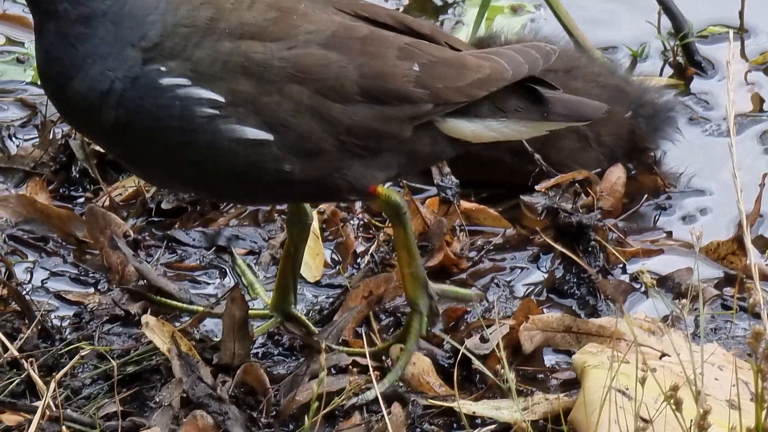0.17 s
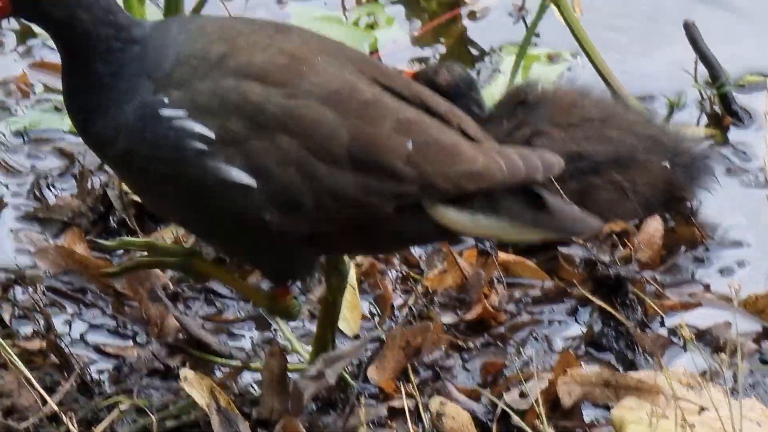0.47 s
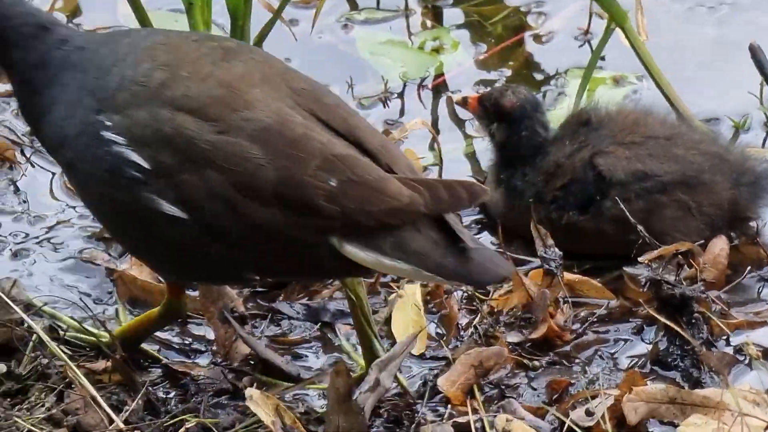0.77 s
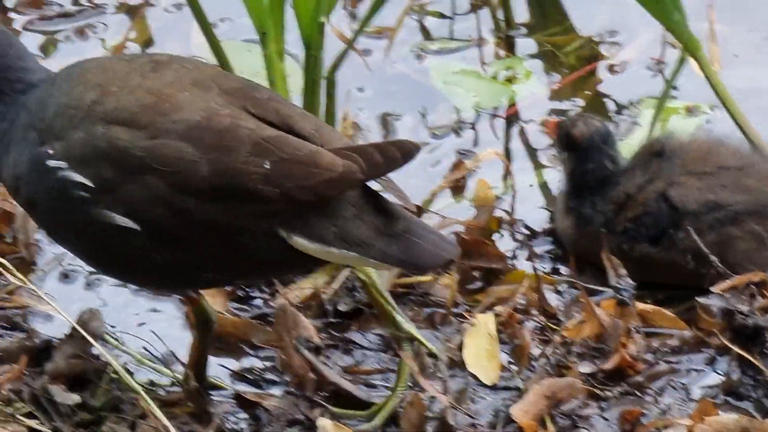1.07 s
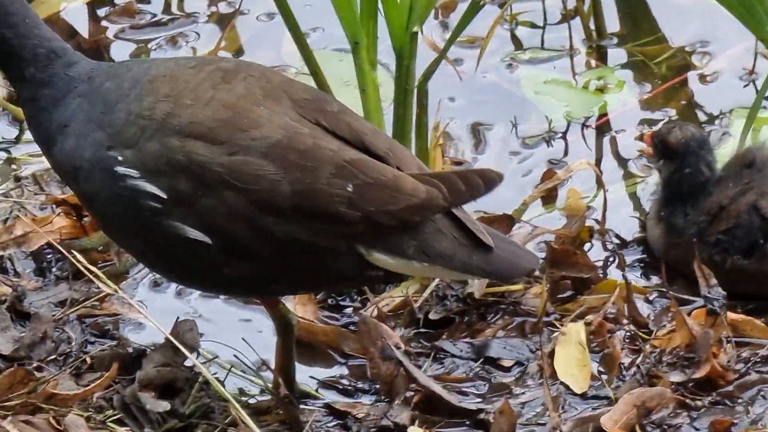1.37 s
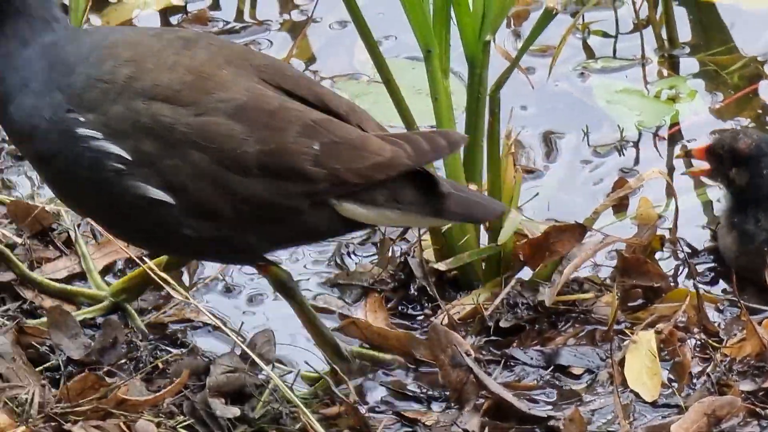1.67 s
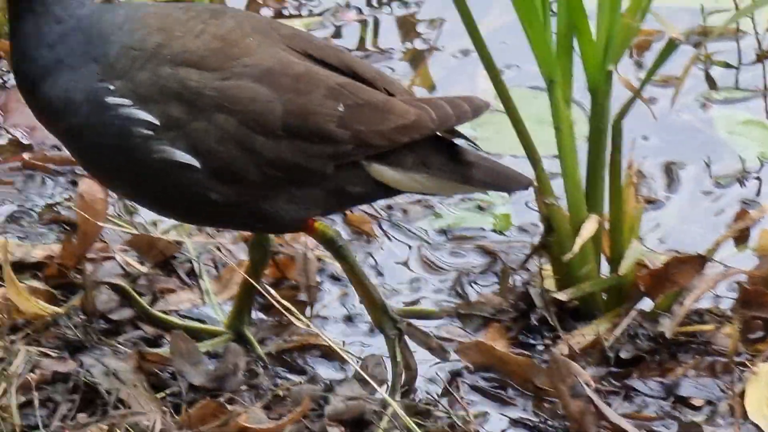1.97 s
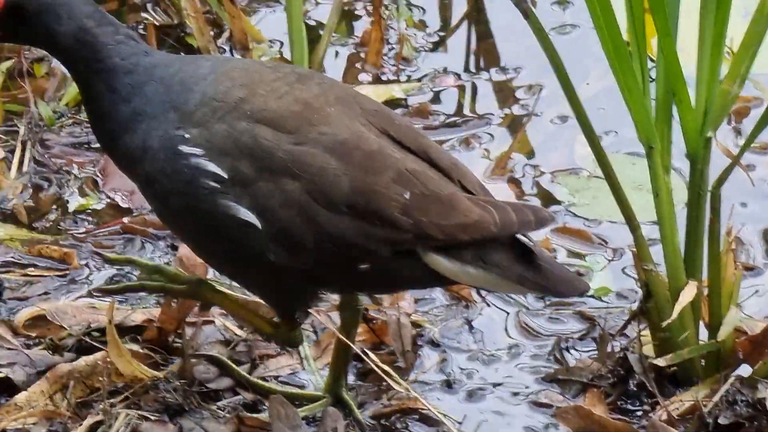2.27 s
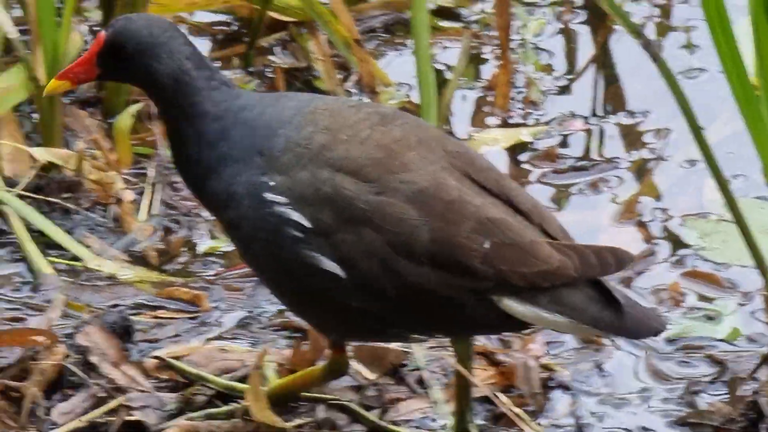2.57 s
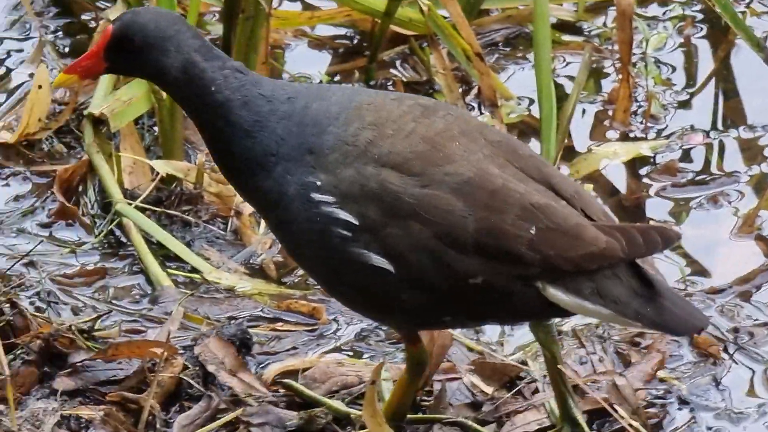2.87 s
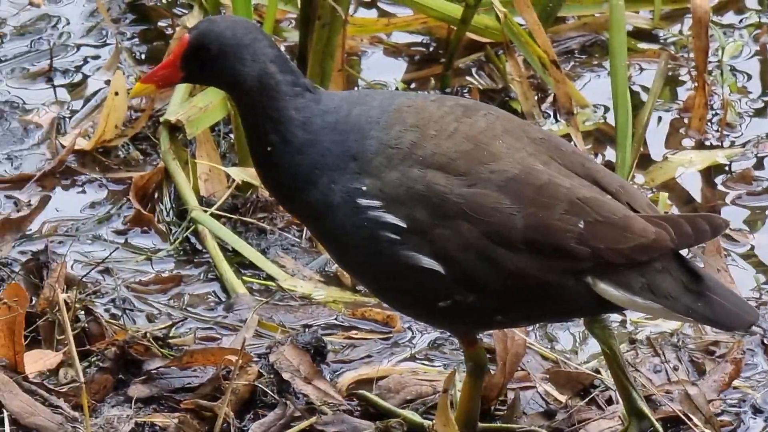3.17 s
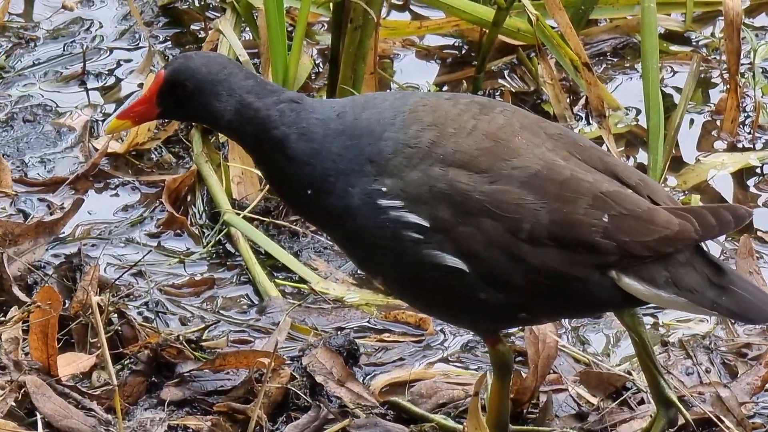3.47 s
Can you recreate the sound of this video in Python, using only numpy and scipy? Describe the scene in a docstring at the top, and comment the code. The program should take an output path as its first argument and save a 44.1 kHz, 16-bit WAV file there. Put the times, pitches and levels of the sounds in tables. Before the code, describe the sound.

Three raspy moorhen squeals sound on a pond bank, two early and one at the end. Between them come a chick's quick yelps, peeps, chirps and one falling whistle, with faint wet leaf ticks and a low rumble, in stereo.

```python
"""A harsh moorhen squeal at a pond edge, over a low, distant rumble. A second squeal follows, then the
chick's hoarse peeps and falling yelps, thin chirps, one clean whistle and a last squeal. Each voice is a
vibrating membrane in the syrinx, rasping when it turns chaotic. Wet leaves tick underfoot; ground and
bank scatter the calls on their way to a stereo microphone."""
import sys
import numpy as np
from scipy import signal
from scipy.fft import rfft, irfft
from scipy.io import wavfile
from scipy.ndimage import uniform_filter1d, map_coordinates

SR = 44100
rng = np.random.default_rng(int(sys.argv[2]) if len(sys.argv) > 2 else 0)


def int16_out(signal):
    """Quantize to a 16-bit WAV file."""
    q = np.round(np.clip(np.atleast_2d(signal).T, -1, 1) * 32767)
    wavfile.write(sys.argv[1], SR, q.astype(np.int16))


N = 159201

# harmonics 1 and 2 of a thin, nearly pure voice (relative level [dB])
THIN_VOICE_DB = [0, -32]
# spectrum of a wet leaf's tick (frequency [Hz], relative level [dB])
LEAF_SPECTRUM = [(800, -27), (3000, 16.5), (7000, 1), (15000, 7)]


def undb(db):
    """Decibels to gain."""
    return 10 ** (np.asarray(db) / 20)


def clock():
    """Time of each sample in seconds."""
    return np.arange(N) / SR


def over_hz(points):
    """Join (frequency [Hz], value) points on a log axis, for every spectral bin."""
    hz, value = np.array(points, float).T
    return np.interp(np.log(np.arange(N // 2 + 1) * SR / N + 1), np.log(hz), value)


def noise(spectrum):
    """Coloured noise of rms 1."""
    x = irfft(rfft(rng.standard_normal(N)) * undb(over_hz(spectrum)), N)
    return x / x.std()


def wander(rate):
    """A smooth random curve of spread 1, with about `rate` new values a second."""
    size = max(2, int(SR / rate))
    x = uniform_filter1d(uniform_filter1d(rng.standard_normal(N), size), size)
    return x / x.std()


def gate(start, end, edge_s=0.00081):
    """Open between two times, with soft edges."""
    t = clock()
    return np.sin(np.pi / 2 * np.clip(np.minimum(t - start, end - t) / edge_s + .5, 0, 1)) ** 2


def curves(rows):
    """The gate of a call, then its columns as curves in time."""
    times, *columns = np.array(rows, float).T
    return [gate(times[0], times[-1])] + [np.interp(clock(), times, c) for c in columns]


def distant_rumble(level_db=-48, swell_db=1.55, hum_waver_db=3):
    """Far-off rumble with a wavering hum; the bass is alike on both sides of the microphone."""
    # rumble spectrum (frequency [Hz], relative level [dB])
    spectrum = [(20, -21), (38, -12), (56, 0), (70, -6), (100, -10), (160, -19), (320, -22), (550, -30),
                (950, -33), (1500, -39), (6500, -44), (8200, -56), (11000, -55), (12500, -49)]
    # likeness of left and right (frequency [Hz], correlation [0-1])
    likeness = [(60, 0.93), (250, 0.92), (500, 0.5), (1000, 0.13)]
    # hum tones (frequency [Hz], level [dB])
    hum_tones = [(57, -52.5), (300, -68)]
    alike = over_hz(likeness)
    mid = irfft(rfft(noise(spectrum)) * np.sqrt((1 + alike) / 2), N)
    side = irfft(rfft(noise(spectrum)) * np.sqrt((1 - alike) / 2), N)
    hum = 0
    for hz, db in hum_tones:
        level = undb(db + hum_waver_db * wander(8.5))
        hum += level * np.sin(2 * np.pi * np.cumsum(hz + 3 * wander(10.26)) / SR)
    return undb(level_db + swell_db * wander(2.1)) * np.array([mid + side, mid - side]) + hum


def leaf_rustle(ticks_per_s=19, softest_db=-64, decay_s=0.00046):
    """Faint random ticks of wet leaves settling."""
    envelope, tick = 0, noise(LEAF_SPECTRUM)
    for when, size in rng.random((int(ticks_per_s * N / SR), 2)):
        age = np.maximum(clock() - when * N / SR, 0)
        envelope += (age > 0) * undb(softest_db + 10 * size) * np.exp(-age / decay_s)
    return envelope * tick


def footsteps(thud_s=0.0033, tick_s=0.0018):
    """Wet leaves underfoot: each step is a small thud and a tick, both dying quickly."""
    # steps (time [s], thud level [dB], tick level [dB])
    steps = [(0.819, -74, -55.5), (1.972, -44.5, -68), (2.274, -71, -56), (2.43, -77, -54)]
    # spectrum of the thud (frequency [Hz], relative level [dB])
    thud_spectrum = [(150, 4), (500, 7), (1000, -9), (3000, -42)]
    out, thud_noise, tick_noise = 0, noise(thud_spectrum), noise(LEAF_SPECTRUM)
    for start, thud_db, tick_db in steps:
        age = np.maximum(clock() - start, 0)
        thud = undb(thud_db) * thud_noise * np.exp(-age / thud_s)
        tick = undb(tick_db) * tick_noise * np.exp(-age / tick_s)
        out += (age > 0) * (thud + tick)
    return out


def syrinx(hz, rough, harmonics_db, overtones_db=0):
    """A vibrating membrane; roughness shakes its pitch and level and smears the upper harmonics."""
    waver, jitter, flutter_db = 0.0259, 0.0486, 5  # at full roughness
    hz = hz * (1 + rough * (waver * wander(139) + jitter * wander(1656)))
    phase = 2 * np.pi * np.cumsum(hz) / SR
    gains = undb(harmonics_db) / np.sqrt(np.sum(undb(harmonics_db) ** 2) / 2)
    overtones = sum(g * np.sin(k * phase) for k, g in enumerate(gains[1:], 2))
    tone = gains[0] * np.sin(phase) + undb(overtones_db) * overtones
    return tone * undb(flutter_db * rough * wander(270))


def rasp(throat, drift=0.014, flutter_db=4.5):
    """Chaotic vibration, fluttering quickly through throat resonances that wander."""
    position = np.cumsum(1 + drift * wander(45.2))  # an uneven read speed moves the resonances
    oversampled = signal.resample(noise(throat), 2 * N)
    x = map_coordinates(oversampled, [2 * position], mode="mirror")
    x *= undb(flutter_db * np.tanh(wander(420)))
    return x / x.std()


def glides(notes, harmonics_db, rough, sharpness, bloom_db=16):
    """Short notes that swell and fade while the pitch slides; the overtones bloom late in the note."""
    out = np.zeros(N)
    for voice in (notes[::2], notes[1::2]):  # neighbours may overlap
        hz, level, bloom = np.zeros((3, N))
        for start, length, from_hz, to_hz, db in voice:
            progress = (clock() - start) / length
            on = (progress > 0) & (progress < 1)
            hz[on] = from_hz + (to_hz - from_hz) * progress[on]
            bloom[on] = np.sin(np.pi * progress[on] ** 2.06)
            level[on] = undb(db) * np.sin(np.pi * progress[on]) ** sharpness
        out += level * syrinx(hz, rough, harmonics_db, bloom_db * (bloom - 1))
    return out


def chirps():
    """Thin, quick slides of the voice, up or down."""
    # chirps (time [s], length [s], start pitch [Hz], end pitch [Hz], level [dB])
    notes = [(.188, 0.013, 2950, 3750, -54), (.24, .015, 4300, 3440, -48.5),
             (.829, .011, 2330, 2770, -58.5), (1.029, .016, 3800, 3467, -43),
             (1.061, .016, 4300, 4050, -48), (1.073, 0.012, 3750, 3360, -46),
             (1.153, .024, 5100, 3590, -54), (1.175, .011, 2780, 2430, -50.5),
             (1.47, 0.014, 2850, 2520, -54), (1.47, .009, 5000, 4700, -55),
             (1.699, 0.012, 4450, 3860, -49.5), (2.453, 0.036, 3900, 4990, -63),
             (2.498, 0.0222, 5100, 4190, -57), (2.594, 0.061, 4780, 5220, -63),
             (2.618, 0.024, 5450, 5760, -58.5), (2.643, 0.02, 5900, 7180, -63),
             (2.658, 0.022, 5600, 5370, -58.5), (2.669, 0.025, 4550, 3290, -56.5)]
    return glides(notes, THIN_VOICE_DB, rough=0.6, sharpness=0.26)


def whistles():
    """A slow, nearly pure falling note, then a faint, rougher one that rises."""
    # clean and faint whistle (time [s], pitch [Hz], level [dB])
    clean = [(2.287, 2830, -57), (2.297, 2871, -43.5), (2.32, 2865, -42.5), (2.386, 2674, -47.5),
             (2.415, 2564, -58), (2.45, 2480, -66)]
    faint = [(2.45, 2670, -72), (2.68, 3150, -65.5), (2.73, 3130, -74)]
    # harmonics 1, 2, 3 of the clean whistle (relative level [dB])
    clean_db = [1.5, -7, -26.5]
    out = 0
    for contour, harmonics_db, rough in ((clean, clean_db, 0.027), (faint, THIN_VOICE_DB, 0.609)):
        on, hz, db = curves(contour)
        out += on * undb(db) * syrinx(hz, rough, harmonics_db)
    return out


def chick_yelps():
    """Quick falls of the voice, rich in overtones."""
    # yelps (time [s], length [s], start pitch [Hz], end pitch [Hz], level [dB])
    notes = [(.497, 0.029, 2390, 1836, -28.5), (1.712, 0.018, 2198, 1890, -35),
             (2.014, .024, 2336, 1670, -39)]
    # harmonics 1, 2, ... of a yelp (relative level [dB])
    harmonics_db = [-10.5, -0.5, 5.5, -11.5, -14, -20, -17]
    return glides(notes, harmonics_db, rough=0.42, sharpness=0.93)


def chick_peeps(rough=0.7, glide_s=0.0093, split_s=0.0187):
    """Each peep rises cleanly, splits into two hoarse, warbling tones at the top, then drops."""
    # arched notes (time [s], length [s], start pitch [Hz], top pitch [Hz], end pitch [Hz], level [dB],
    # dip in the middle [dB], upper tone [Hz], upper tone level [dB], rasp level [dB])
    notes = [(1.351, 0.14, 3920, 4400, 3620, -56.5, -5.5, 4860, -64, -57),
             (1.616, 0.11, 3610, 4370, 3850, -49, -19, 4910, -63, -58),
             (1.908, .112, 3385, 4166, 3130, -53, -16, 5040, -65, -64.5)]
    # the chick's throat resonances (frequency [Hz], relative level [dB])
    throat = [(2000, -14.5), (3200, -7), (4300, -3), (6200, -2.5), (7500, -19), (11000, -28)]
    out = 0
    for start, length, from_hz, top_hz, to_hz, db, dip_db, upper_hz, upper_db, rasp_db in notes:
        age = np.clip(clock() - start, 0, length)
        rise, fall = np.exp(-age / glide_s), np.exp((age - length) / glide_s)
        hz = top_hz + (from_hz - top_hz) * rise + (to_hz - top_hz) * fall
        hoarse = np.clip(age / split_s - 1, 0, 1) * (1 - fall ** 2)
        lower = undb(db + dip_db * hoarse) * (1 - rise ** 2) * syrinx(hz, rough * hoarse, THIN_VOICE_DB)
        upper = undb(upper_db) * syrinx(hz * upper_hz / top_hz, rough / 2, THIN_VOICE_DB)
        hiss = undb(rasp_db) * np.sqrt(age / length) * rasp(throat)
        out += gate(start, start + length) * (lower + hoarse * (upper + hiss))
    return out


def squeal(contour, harmonics_db, throat, overtones_db=0):
    """A long harsh call in which the syrinx slips between tone and rasp."""
    on, hz, tone_db, rough, rasp_db = curves(contour)
    tone = undb(tone_db) * syrinx(hz, rough, harmonics_db, overtones_db)
    return on * (tone + undb(rasp_db) * rasp(throat))


def moorhen_squeals():
    """Three separate squeals, each with its own harmonics and throat colour."""
    # course of each squeal (time [s], pitch [Hz], tone level [dB], roughness [0-1], rasp level [dB])
    first = [(.12, 2200, -59.5, .2, -63), (.195, 2120, -53, 0.63, -52), (.215, 1950, -51.5, 0.28, -47.5),
             (.262, 2110, -46, 0.42, -49), (.289, 2050, -48.5, 0.42, -51), (.298, 2300, -45.5, 0.38, -44.5),
             (.316, 2280, -53, 0.22, -56), (.326, 2150, -46, 0.1, -46), (.358, 2238, -44.5, 0.06, -56),
             (.392, 2200, -48, 0.27, -51.5), (.412, 2000, -51, 0.45, -47), (.478, 1990, -49.5, 0.47, -44.5),
             (.497, 2380, -52, 0.54, -41), (.512, 2150, -57, .4, -54)]
    second = [(.855, 1957, -88, .7, -62), (.89, 2104, -66, 0.46, -46), (.908, 2250, -48, .14, -58),
              (.945, 2265, -47.5, 0.13, -53.5), (.968, 2230, -53.5, 0.48, -49),
              (1.0, 1850, -77, 0.82, -47.5), (1.04, 1773, -72, 0.25, -43.5), (1.11, 1797, -76, 0.63, -47),
              (1.145, 2103, -57, 0.58, -54.5), (1.18, 2145, -81, 0.51, -69)]
    third = [(2.84, 1850, -110, 0.97, -71), (2.905, 1998, -64, 0.39, -64), (2.936, 2210, -44.5, .1, -61),
             (2.948, 2387, -47, .14, -59), (2.975, 2283, -45, 0.15, -57), (2.998, 2306, -48, 0.19, -46),
             (3.08, 2419, -46.5, 0.11, -49.5), (3.11, 2233, -41, 0.043, -53),
             (3.123, 2460, -58.5, .074, -70)]
    # harmonics 1, 2, ... of each squeal (relative level [dB])
    first_db = [-6.5, -5.5, 4, -12, -29]
    second_db = [-2.5, 3, 3.5, -25]
    third_db = [9, 5, -13, -43, -24, -30]
    # throat resonances that colour the rasp (frequency [Hz], relative level [dB])
    first_throat = [(1500, -38), (2400, -22), (2800, -10.5), (3300, -24), (4000, -2.5), (5200, -4),
                    (5950, 2.5), (6900, -6), (8000, -22), (10200, -16), (11200, -27)]
    second_throat = [(1500, -29), (2950, -13), (3550, 6.5), (3850, -6), (4150, 5.5), (4700, -13.5),
                     (5500, 4), (6350, -15), (7300, 0.5), (8500, -26.5), (11000, -29.5), (15500, -23)]
    third_throat = [(1500, -61), (2100, 5), (2700, -9), (3400, -11), (4100, 1), (5000, 2), (6200, -1),
                    (7100, 6), (7900, -29), (9900, -5.5), (10800, -24)]
    # swings of the third squeal's overtones (time [s], gain [dB])
    third_overtones = [(2.9, 11), (2.936, -20), (2.95, -1), (2.976, -16), (3.0, 0.5), (3.06, 17),
                       (3.11, -4.5), (3.123, 21.5)]
    return (squeal(first, first_db, first_throat),
            squeal(second, second_db, second_throat),
            squeal(third, third_db, third_throat, overtones_db=curves(third_overtones)[1]))


def place(x, ground_db, bank_db, pan_left_db=0, left_lag_ms=0):
    """Direct sound at the two microphone ports, quick ground scatter and a later tail from the bank."""
    # reflections (level [dB], time to fall 60 dB [s], delay [s])
    reflections = [(ground_db, 0.094, 0.003), (bank_db, 0.42, 0.019)]
    t = clock()[:SR]
    ports = []
    for side in (1, -1):  # left, right
        tail = 0
        for db, t60, delay in reflections:
            echo = rng.standard_normal(SR) * np.exp(-np.log(1000) * t / t60) * (t > delay)
            tail += undb(db) * echo / np.linalg.norm(echo)
        direct = np.roll(x, round(side * left_lag_ms * SR / 2000))
        ports.append(undb(side * pan_left_db / 2) * (direct + signal.fftconvolve(x, tail)[:N]))
    return np.array(ports)


def scene():
    """Calls from five spots on the bank, ahead and slightly left, over the distant rumble."""
    first, second, third = moorhen_squeals()
    chick = chick_yelps() + chick_peeps()
    chirping, whistling = chirps(), whistles()
    return (place(first, ground_db=1, bank_db=-5, pan_left_db=2)
            + place(second + chirping + footsteps() + leaf_rustle(), ground_db=0, bank_db=-9.5)
            + place(third, ground_db=-2.5, bank_db=-20.5, pan_left_db=1, left_lag_ms=-0.04)
            + place(chick, ground_db=0.5, bank_db=-12.5, pan_left_db=2)
            + place(whistling, ground_db=-3.5, bank_db=-4, pan_left_db=2.5, left_lag_ms=0.36)
            + distant_rumble())


def record(dry, start_s=0.11, top_hz=15900):
    """The microphone's right port is brighter than its left; the sound opens abruptly, its top cut."""
    # response of each port (frequency [Hz], gain [dB])
    left_port = [(5000, 0), (10000, -9.5), (12500, -9)]
    right_port = [(5000, 1.08), (10000, 0)]
    coloured = irfft(rfft(dry) * undb([over_hz(left_port), over_hz(right_port)]), N)
    top_cut = signal.ellip(10, .2, 70, top_hz, fs=SR, output="sos")
    return signal.sosfilt(top_cut, coloured * gate(start_s, np.inf))


dry = scene()
out = record(dry)
int16_out(out)
```